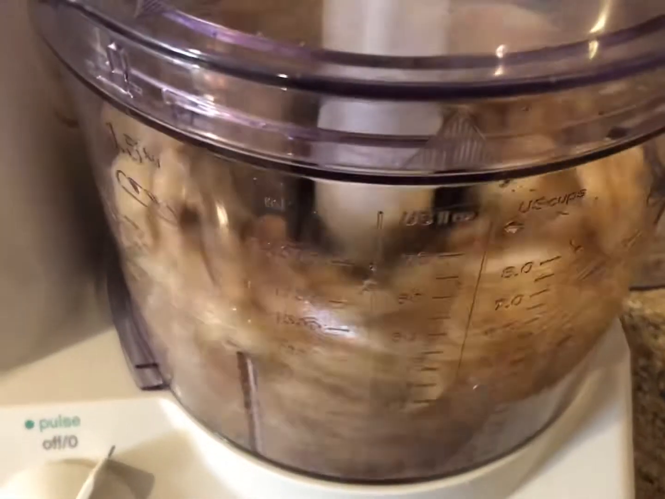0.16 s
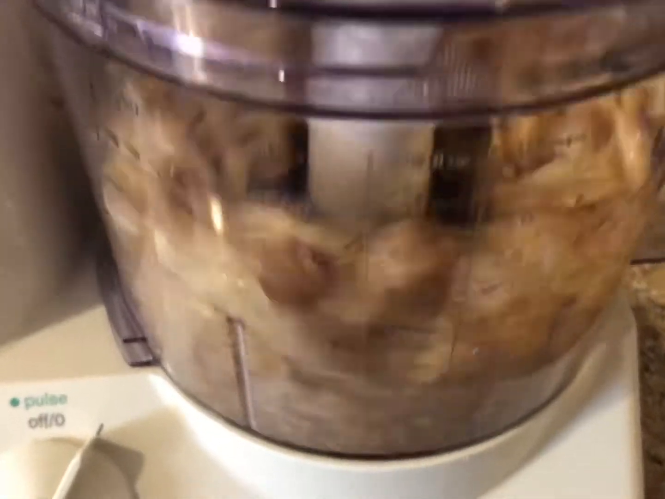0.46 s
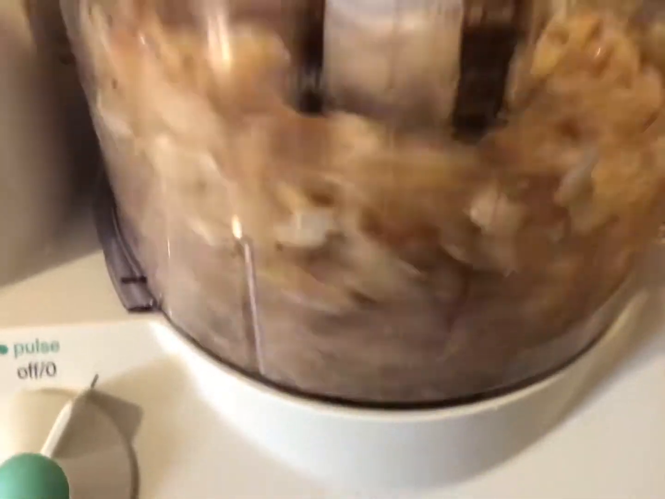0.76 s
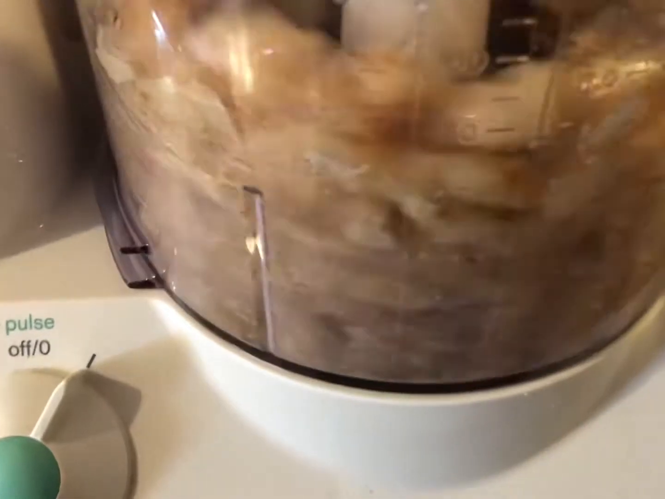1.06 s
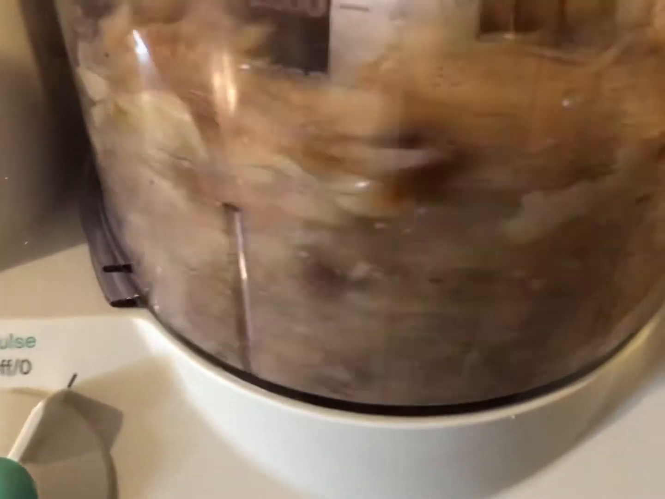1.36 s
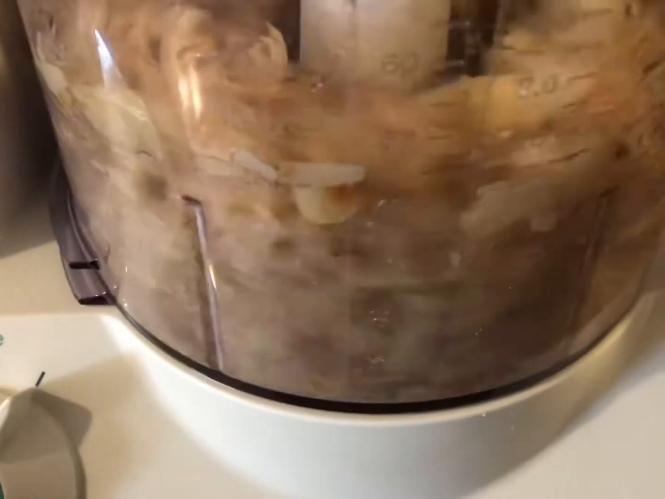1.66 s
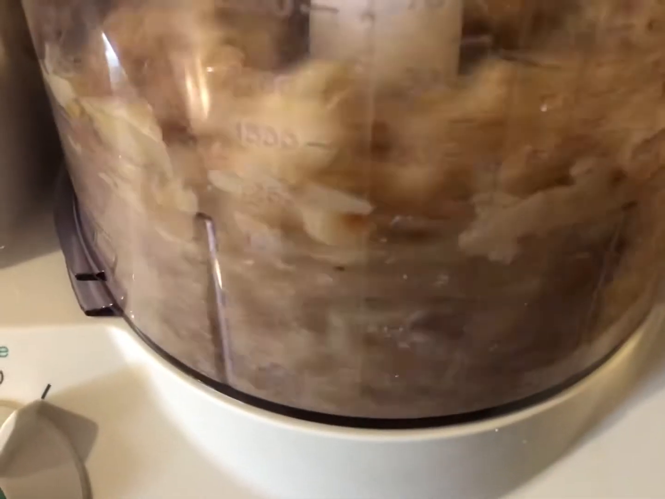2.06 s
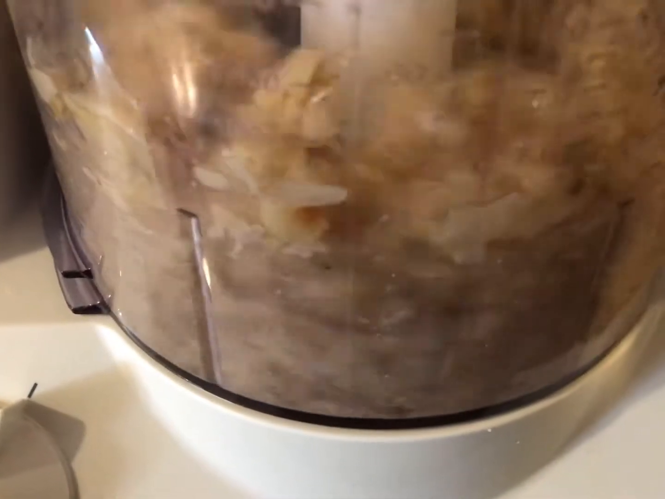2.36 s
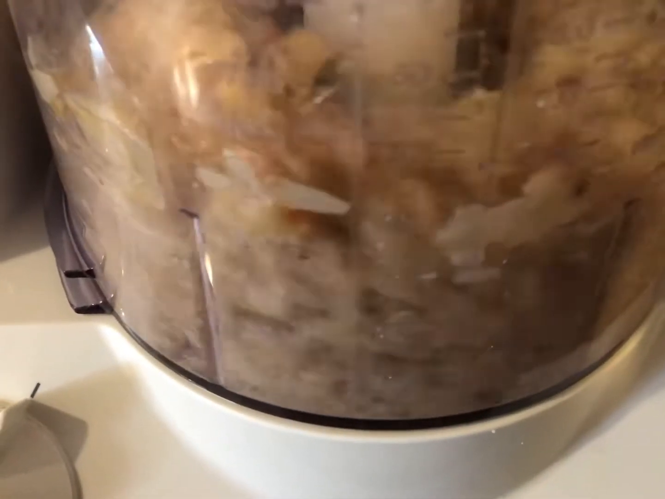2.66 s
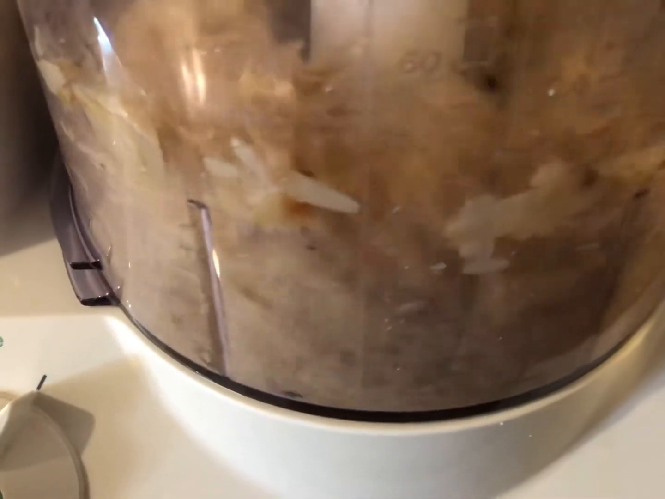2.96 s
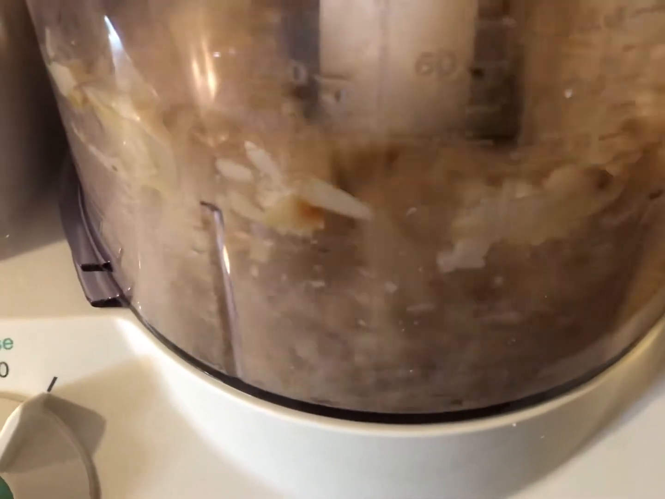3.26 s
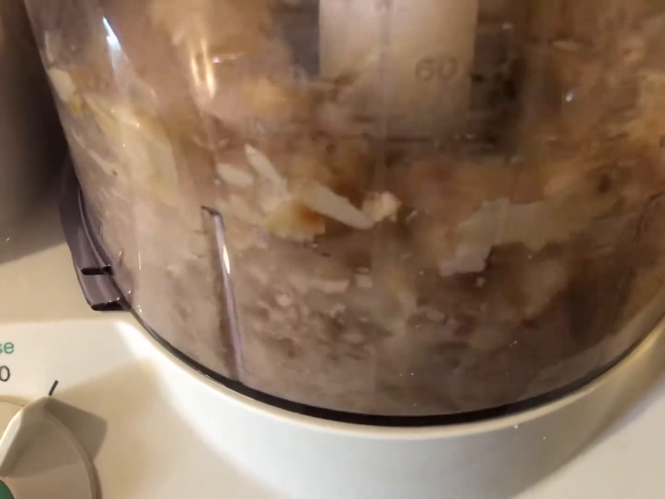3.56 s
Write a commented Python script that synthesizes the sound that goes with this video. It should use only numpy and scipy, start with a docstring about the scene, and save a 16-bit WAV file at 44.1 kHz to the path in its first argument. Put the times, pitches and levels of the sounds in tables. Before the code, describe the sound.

A food processor runs close to the microphone with a steady high whine, churning wet food. Chunks knock, crack and thud in the plastic bowl at first, then settle into a lighter patter as they get finer.

```python
"""A food processor chops wet food, heard from just beside its plastic bowl.
The motor whines at 16 times its shaft speed over a ringing rush of cooling air. Gears turn a two-armed
blade more slowly, and it churns the food round the bowl. Pieces patter, snap, knock and crack against
the wall, less as they get finer, and early on a few lumps thud under the blade."""
import sys
import numpy as np
from scipy import signal
from scipy.fft import rfft, irfft
from scipy.io import wavfile

SR = 44100
rng = np.random.default_rng(int(sys.argv[2]) if len(sys.argv) > 2 else 0)


def bounce(signal):
    """Save signal as a 16-bit WAV file at the path given by the first command-line argument."""
    frames = np.transpose(np.atleast_2d(signal))
    limited = np.clip(frames, -1, 1)
    pcm = np.round(limited * 32767).astype(np.int16)
    wavfile.write(sys.argv[1], SR, pcm)


N = 163170
T = np.arange(N) / SR
FREQS = np.fft.rfftfreq(2 * N, 1 / SR) + 1e-3

# how hard the food drags on the blade, easing as it gets finer: time_s, drag_factor
DRAG = [(0, 1.45), (.8, 1.45), (1.6, 1.05), (3.7, .9)]


def undb(db):
    """Turn decibels into a number to multiply by."""
    return 10 ** (np.asarray(db) / 20)


def unit(x):
    """Scale a signal so that its average strength (rms) is 1."""
    return x / np.sqrt(np.mean(x ** 2))


def curve(rows):
    """Join (time_s, value) rows with straight lines."""
    return np.interp(T, *np.array(rows).T)


def noise():
    """White noise: an even hiss."""
    return rng.standard_normal(N)


def through(x, response):
    """Pass a sound through a filter, given as one gain for each frequency."""
    return irfft(rfft(x, 2 * N) * response)[:N]


def resonance(hz, width_hz):
    """A filter that rings at one pitch; the narrower it is, the longer it rings."""
    return 1 / (1 + 1j * (FREQS / hz - hz / FREQS) * hz / width_hz)


def colour(rows):
    """A filter shaped by (pitch_hz, level_db) rows."""
    hz, db = np.array(rows).T
    gain = undb(np.interp(np.log(FREQS), np.log(hz), db))
    cepstrum = irfft(np.log(gain))
    cepstrum[1:N] *= 2  # using only this half makes the filter ring after a click, never before
    return np.exp(rfft(cepstrum[:N], 2 * N))


def waver(hz):
    """A smooth random wobble of size about 1, mostly slower than hz."""
    return unit(through(noise(), 1 / (1 + 1j * FREQS / hz) ** 2))


def clicks(per_s, scatter_db):
    """Clicks at random moments, of random size and sign."""
    happens = rng.random(N) < per_s / SR
    size = undb(scatter_db * np.clip(noise(), -2, 2))
    return happens * size * np.sign(noise())


def bursts(rows, decay_s):
    """Puffs of noise that start suddenly and die away, one for each (start_s, level_db) row."""
    loudness = sum(undb(db) * (T >= s) * np.exp(-np.abs(T - s) / decay_s) for s, db in rows)
    return loudness * noise()


def blade_load(blade_turns, depth_db, scatter_db, lopsided_db):
    """The load swells each time one of the two arms meets the food, and no two passes are alike."""
    shifted_turns = blade_turns + .06 * waver(12)  # shifting food is met early or late
    chance = rng.standard_normal(256)
    each_pass = np.interp(2 * blade_turns, np.arange(len(chance)), chance)
    both_arms_db = depth_db * np.cos(4 * np.pi * shifted_turns)
    one_arm_db = lopsided_db * np.cos(2 * np.pi * shifted_turns)
    swell_db = both_arms_db + one_arm_db + scatter_db * each_pass
    return unit(undb(swell_db * curve(DRAG)))


def bowl_filter():
    """The plastic bowl rings at several pitches when it is hit."""
    # the bowl's ringing notes: pitch_hz, width_hz, level_db
    notes = [(266, 87, -7.5), (654, 38, -12.5), (863, 110, -10), (1055, 132, -5.5), (1270, 150, -10.5),
             (1606, 130, -3.5), (1714, 80, 5.5), (1790, 78, 4.5), (1983, 47, -6), (3230, 320, -7),
             (3956, 360, -13.5)]
    return sum(undb(db) * resonance(hz, width) * (-1) ** k for k, (hz, width, db) in enumerate(notes))


def snap_filter():
    """The bright tone of a crisp piece breaking."""
    # how strong a snap is from low to high: pitch_hz, level_db
    tone = [(100, -25), (600, -4.5), (1800, 8.5), (2500, 7.5), (3500, 12.5), (4400, 5), (5300, 0),
            (7000, -0.5), (7800, 1.5), (10200, 2), (12000, -0.5), (14300, -2), (16000, -7)]
    return colour(tone)


def motor(shaft_turns):
    """The motor whines above its weaker tones; the rotor shudders under drag, roughening the whine."""
    # loudness of the whine: time_s, level_db
    whine_levels = [(0, -22.5), (.14, -17), (.32, -19.5), (.48, -14.5), (.73, -21), (.9, -17.5),
                    (1.45, -18.5), (1.65, -16), (2.05, -17), (2.19, -19), (2.38, -17), (3.7, -16.5)]
    # weaker tones of the shaft: cycles_per_turn, level_db
    shaft_tones = [(1, -62), (8, -36), (9, -48), (13, -43), (14, -58), (15, -40), (17, -36.5), (18, -69),
                   (19, -51), (32, -46), (36, -58), (48, -46)]
    whine_cycles_per_turn, shudder_hz = 16, 130
    angle = 2 * np.pi * shaft_turns
    drag = curve(DRAG)
    phase = whine_cycles_per_turn * angle + .42 * drag * waver(shudder_hz)
    flutter = undb(0.38 * drag * waver(57))
    whine = undb(curve(whine_levels)) * unit(flutter * np.sin(phase))
    rasp = waver(161) * np.sin(phase) + waver(161) * np.cos(phase)  # noise that follows the whine's pitch
    tones = sum(undb(db) * unit(np.sin(k * angle + 2 * np.pi * rng.random())) for k, db in shaft_tones)
    return whine + undb(-25.5) * rasp + tones


def ringing(notes):
    """Noise keeps each (pitch_hz, width_hz, level_db) note ringing."""
    return sum(undb(db) * unit(through(noise(), resonance(hz, 1.45 * width) ** 2))
               for hz, width, db in notes)


def cooling_air():
    """Air rushes through the motor; with the brush hiss it rings the housing and base, and whistles."""
    # how strong the rush is from low to high: pitch_hz, relative_db
    rush_tone = [(40, -25), (100, -8), (270, 4.5), (500, -0.5), (1000, -4), (2300, -2), (2800, -14),
                 (3700, -4.5), (4500, -15), (7000, -17.5), (9700, -19), (11200, -17), (14300, -13),
                 (15600, -19)]
    # loudness of the rush, a little higher under load: time_s, level_db
    rush_levels = [(0, -27.5), (1.2, -24.5), (2.4, -29), (3.7, -26.5)]
    # ringing notes of the motor housing: pitch_hz, rough_width_hz, level_db
    housing_notes = [(3134, 108, -27), (3277, 123, -25), (3420, 230, -33)]
    # steady drone of the motor base: pitch_hz, rough_width_hz, level_db
    base_notes = [(237.5, 33, -34), (294.6, 39, -33.5), (638.3, 17, -36)]
    # thin whistles of the motor: pitch_hz, rough_width_hz, relative_db
    whistle_notes = [(5810, 70, -46), (6044, 120, -41), (6265, 110, -40.5), (6510, 230, -42.5),
                     (9800, 370, -41), (12570, 280, -38.5), (12800, 500, -44), (13470, 260, -43),
                     (15300, 300, -44), (15650, 180, -40.5)]
    # the whistles come out as the load eases: time_s, gain_db
    whistle_gains = [(0, -4), (.8, -1.5), (1.55, 0.5), (2.5, 0), (3.7, 1)]
    rush = undb(curve(rush_levels)) * unit(through(noise(), colour(rush_tone)))
    body = ringing(housing_notes) + ringing(base_notes)
    whistles = undb(curve(whistle_gains) + 0.72 * waver(15)) * ringing(whistle_notes)
    return rush + body + whistles


def churn(blade_turns):
    """The blade pushes the wet food round the bowl, so its noise swells with every pass."""
    # how strong the churning is from low to high: pitch_hz, relative_db
    tone = [(25, -37), (40, -13), (60, -10.5), (90, -5), (130, -1.5), (190, -2), (250, 0), (310, -1),
            (400, -2), (480, -6.5), (570, -5.5), (640, -3.5), (740, -4.5), (880, -0.5), (1050, -3),
            (1250, -4), (1550, -3.5), (2000, -5), (2250, -18.5), (4000, -30.5)]
    # loudness of the churning: time_s, level_db
    levels = [(0, -17.5), (.35, -17.5), (.9, -18), (1.6, -18), (2.4, -19.5), (3.7, -20.5)]
    load = blade_load(blade_turns, depth_db=1.5, scatter_db=1.37, lopsided_db=0.94)
    return undb(curve(levels)) * unit(through(load * noise(), colour(tone)))


def patter(load):
    """Each pass of the blade flings soft pieces at the wall, and they ring the bowl."""
    # loudness of the patter: time_s, level_db
    levels = [(0, -22.5), (.3, -19), (.9, -17), (1.1, -17), (1.45, -17), (1.8, -19.5), (2.45, -21.5),
              (2.65, -21), (3.1, -21), (3.29, -17.5), (3.42, -22.5), (3.7, -18.5)]
    hits = clicks(per_s=900 * load, scatter_db=3)
    return undb(curve(levels)) * unit(through(hits, bowl_filter()))


def snaps(load):
    """Crisp pieces snap in tiny bright bursts, more often when the food drags hard."""
    # loudness of the small snaps: time_s, level_db
    levels = [(0, -23), (.3, -22), (.75, -24), (1.2, -24.5), (1.8, -27), (2.6, -28), (3.7, -26.5)]
    splits = clicks(per_s=700 * load * curve(DRAG), scatter_db=7.0)
    energy = through(splits ** 2, 1 / (1 + 1j * FREQS / 190))  # gives each click a short tail
    crunch = np.sqrt(np.abs(energy)) * noise()
    return undb(curve(levels)) * unit(through(crunch, snap_filter()))


def knocks():
    """Big pieces knock on the bowl, mostly while the food is still coarse."""
    # blows of the big pieces: start_s, relative_db
    hits = [(0.0355, -4), (0.1584, 2), (0.1848, -2), (0.2553, -2.5), (0.2895, -5), (0.4618, -7),
            (0.5222, -8.5), (0.5665, -8), (0.7093, -10), (0.756, -5.5), (0.9288, -5), (1.073, -2),
            (1.1144, -12), (1.2092, -13), (2.6539, -6), (3.279, -3)]
    body = resonance(hz=1514, width_hz=680) ** 2
    body = body / np.sqrt(np.mean(np.abs(body) ** 2))
    return undb(-5.5) * through(bursts(hits, decay_s=0.0064), body)


def cracks():
    """Hard pieces crack against the wall: a sharp snap with a little ring from the bowl."""
    # blows of the hard pieces: start_s, relative_db
    hits = [(.036, -17), (.0852, -22), (.158, -15), (.2329, -16), (.3012, -17), (.379, -18), (.4718, -13),
            (.5192, -19), (.5636, -14), (.7063, -15), (.7257, -14), (.7542, -10), (1.054, -10),
            (1.527, -11.5), (2.3062, -15), (2.4877, -11.5), (2.927, -13), (3.532, -17)]
    return through(bursts(hits, decay_s=0.0021), snap_filter() + undb(-11) * bowl_filter())


def thuds():
    """Lumps thud under the blade, each a low note that swells and fades quickly."""
    # the lumps: start_s, level_db
    lumps = [(.11, -24), (.33, -16), (.585, -26), (0.786, -18.5), (1.335, -24)]
    pitch_hz, rise_s = 118, 0.011
    sound = np.zeros(N)
    for start_s, level_db in lumps:
        age = np.maximum(T - start_s, 0)
        swell = age / rise_s * np.exp(1 - age / rise_s)
        sound += undb(level_db) * swell * np.sin(2 * np.pi * pitch_hz * age)
    return sound


def scene():
    """One shaft drives both the whine and, through gears, the blade that chops the food."""
    # shaft speed, wavering with the load: time_s, turns_per_s
    speeds = [(0.0, 199.1), (0.16, 198.4), (0.27, 201.6), (0.34, 198.4), (0.52, 203.1), (0.56, 199.6),
              (0.83, 197.6), (0.87, 195.4), (1.06, 199.2), (1.22, 197.3), (1.29, 201.3), (1.36, 197.4),
              (1.77, 200.5), (1.8, 197.7), (2.04, 198.3), (2.18, 196.7), (2.22, 199.3), (2.45, 196.3),
              (2.6, 199.2), (2.94, 195.7), (3.14, 196.7), (3.2, 192.1), (3.36, 195.4), (3.4, 192.0),
              (3.5, 195.5), (3.69, 195.7)]
    gear_ratio = 7.5
    shaft_turns = np.cumsum(curve(speeds) * (1 + .0015 * waver(19))) / SR
    blade_turns = shaft_turns / gear_ratio
    running = motor(shaft_turns) + cooling_air() + churn(blade_turns)
    load = blade_load(blade_turns, depth_db=3, scatter_db=2.8, lopsided_db=1.22)
    pieces = patter(load) + snaps(load) + cracks() + knocks() + thuds()
    return (running + pieces)[None]


def record(dry):
    """The microphone thins the deep bass, rounds off the biggest peaks and cuts the highest treble."""
    low_cut_hz, high_cut_hz, ceiling = 49, 15750, 1.02
    thinned = signal.sosfilt(signal.butter(3, low_cut_hz, "high", fs=SR, output="sos"), dry)
    rounded = thinned / (1 + (thinned / ceiling) ** 6) ** (1 / 6)
    return signal.sosfilt(signal.ellip(12, .2, 90, high_cut_hz, fs=SR, output="sos"), rounded)


dry = scene()
out = record(dry)
bounce(out)
```